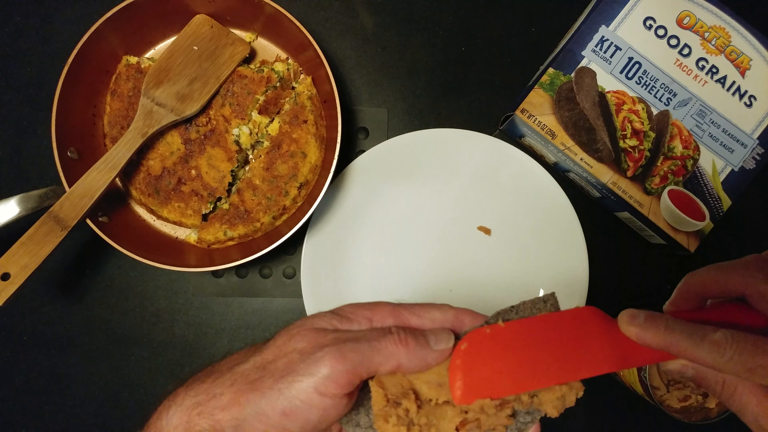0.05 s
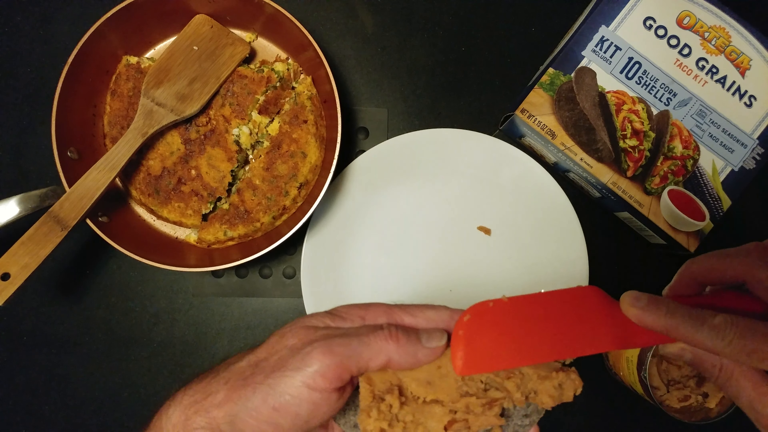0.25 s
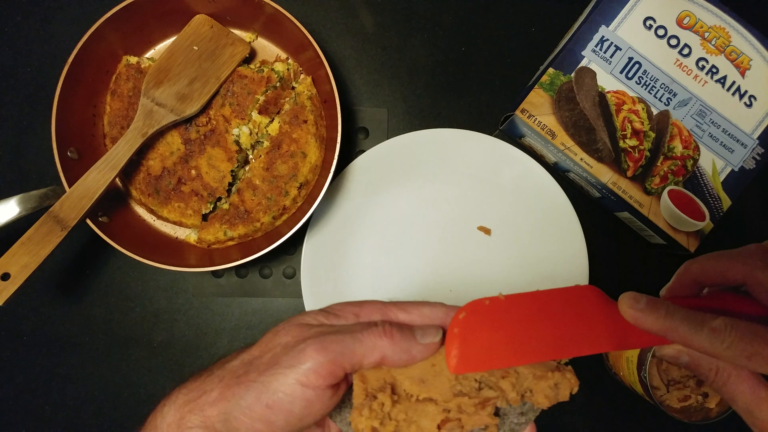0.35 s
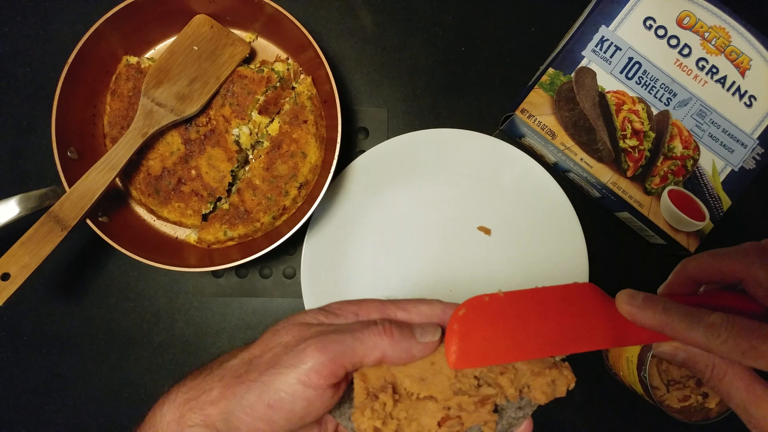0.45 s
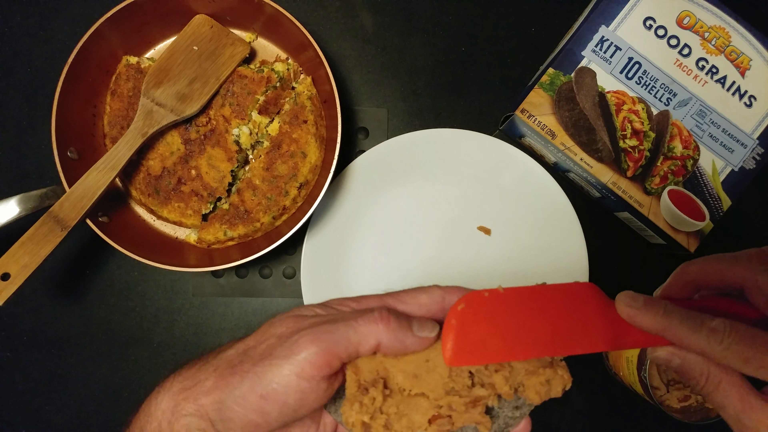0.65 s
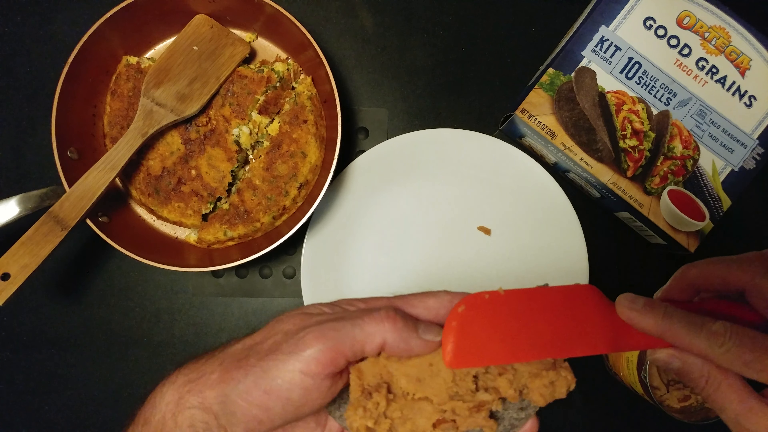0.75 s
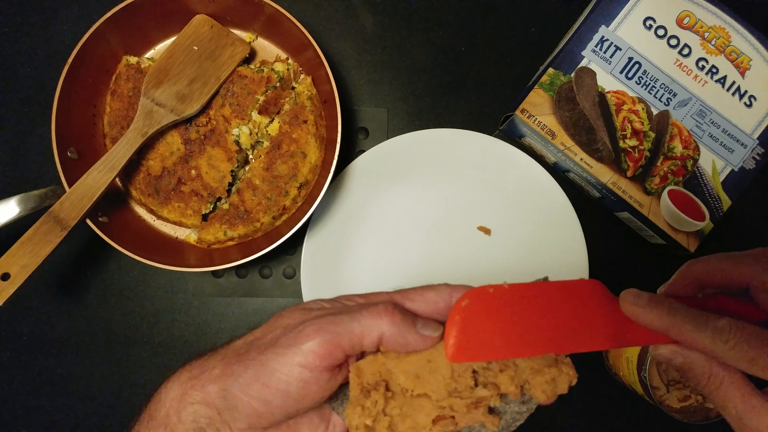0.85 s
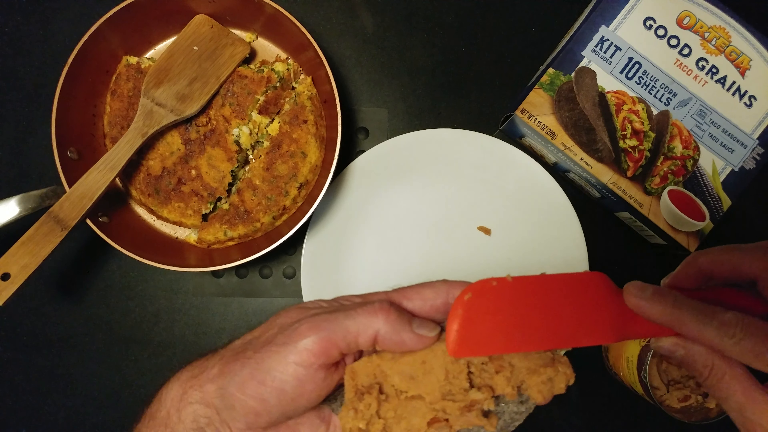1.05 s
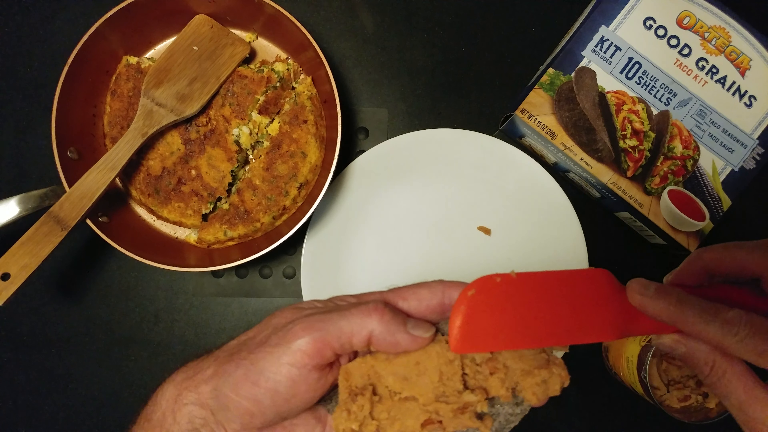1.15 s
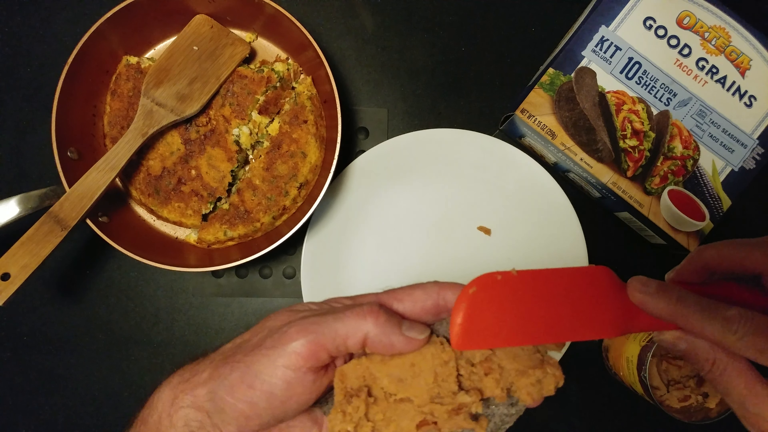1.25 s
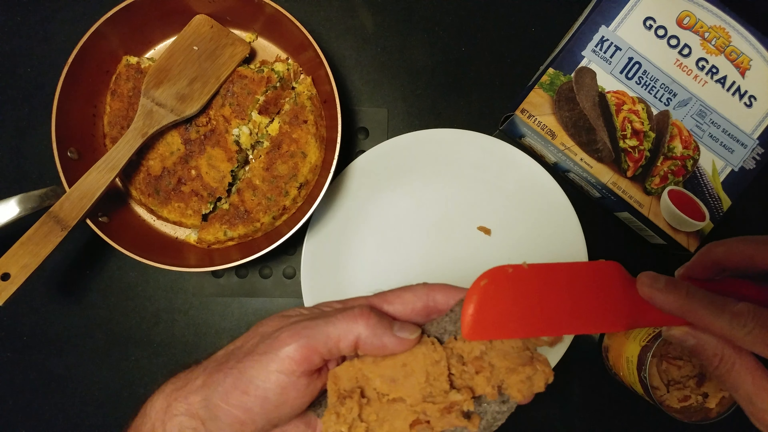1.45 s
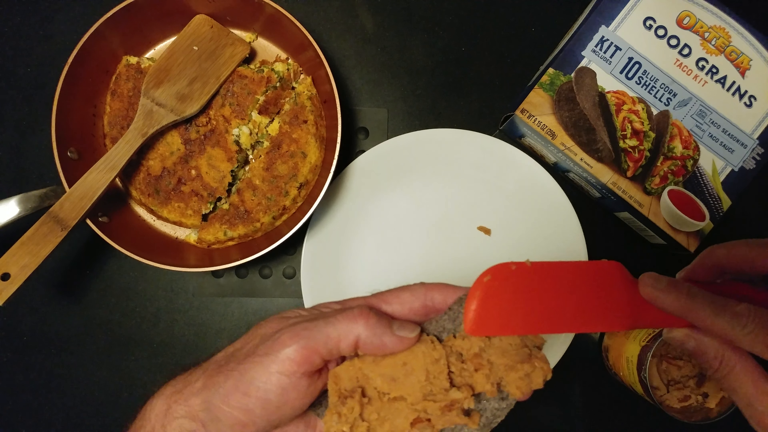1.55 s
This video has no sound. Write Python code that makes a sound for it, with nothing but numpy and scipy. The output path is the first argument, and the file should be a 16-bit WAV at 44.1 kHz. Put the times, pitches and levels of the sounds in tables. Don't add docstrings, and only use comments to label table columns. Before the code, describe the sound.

A crisp corn shell cracks under a soft spatula spreading beans. Tiny ticks from 0.03 s lead to a bright, dry crack at 0.22 s and a louder one at 0.28 s, with dull knocks and a short small-kitchen tail. Around 0.62-0.7 s comes a soft scrape with light ticks, a fainter scrape at 0.8 s, then barely audible rubs and ticks until about 1.45 s. Low refrigerator hum and faint hiss throughout.

```python
import sys
import numpy as np
from scipy import signal
from scipy.fft import rfft, irfft
from scipy.io import wavfile
from scipy.ndimage import uniform_filter1d

SR = 44100
rng = np.random.default_rng(int(sys.argv[2]) if len(sys.argv) > 2 else 0)


def makeup_ratio(level_db):
    decades = np.asarray(level_db, float) / 20
    return 10 ** decades


def to_wav(s):
    ch = np.atleast_2d(s).T
    pcm = np.round(np.clip(ch, -1, 1) * 32767)
    wavfile.write(sys.argv[1], SR, pcm.astype(np.int16))


N = 70560

# (frequency [Hz], width [Hz], left level [dB], right level [dB])
SHELL = [(1535, 1300, -27, -25), (2500, 620, -14, -7.5), (3150, 810, -2.5, -2), (4000, 560, -8, -8),
         (5070, 640, 5.4, 2), (5590, 320, -1.5, 2.1), (6395, 270, -8.5, -13), (8220, 610, -9, -9.5),
         (9000, 600, 1, -4), (12050, 400, -11.5, -12), (13000, 1000, -10.5, -10.5), (15100, 1100, -14, -14)]


def evened(x):
    return x / np.sqrt(np.mean(x ** 2) + 1e-20)


def read(points, hz):
    f, value = np.transpose(points)
    return np.interp(np.log(hz + 1), np.log(f + 1), value)


def noise(shape_db, same):
    frames, hz = N // 256 + 5, np.fft.rfftfreq(1024, 1 / SR)
    a, b, c, d, patches = rng.standard_normal((frames, 513, 5)).T
    patches = uniform_filter1d(uniform_filter1d(patches, 8, 0), 10, 1)
    patch_db = 0.7 * evened(patches)
    same = np.clip(same(hz), -1, 1)[:, None]
    left = a + 1j * b
    right = same * left + np.sqrt(1 - same ** 2) * (c + 1j * d)
    z = np.array([left, right]) * makeup_ratio(shape_db(hz)[:, None] + patch_db)
    return evened(signal.istft(z, nperseg=1024, noverlap=768)[1][:, :N])


def room_air():
    # (frequency [Hz], density [dB per Hz])
    air_curve = [(15, -44.5), (25, -14.5), (108, -2.5), (146, -12), (228, -8), (412, -9.5), (449, -13.5),
                 (521, -12), (4000, -39.5), (5200, -67), (8800, -120)]
    # (frequency [Hz], left-right likeness [-1..1])
    likeness = [(60, -0.13), (130, 0.68), (290, 0.64), (640, 0.2), (1410, -0.41), (3100, 0.96),
                (6820, -0.01), (15000, 0.03)]
    return makeup_ratio(-63.5) * noise(lambda hz: read(air_curve, hz), lambda hz: read(likeness, hz))


def microphone_hiss():
    # (frequency [Hz], density [dB per Hz])
    hiss_curve = [(800, -7.5), (2000, -4), (4000, -1.5), (7000, -2), (8600, -.5), (10700, -5), (15800, -2),
                  (16100, -31)]
    return makeup_ratio(-75) * noise(lambda hz: read(hiss_curve, hz), lambda hz: 0 * hz)


def refrigerator():
    # (frequency [Hz], width [Hz], level [dB])
    drone_lines = [(59, 8, -82.5), (115.6, 8, -77.5), (123, 4.1, -75.5), (226.5, 6, -72.5),
                   (356, 10.27, -78.5), (406.5, 20, -75.5), (832, 5, -82), (1216, 4, -92.5),
                   (1233, 4, -88.5)]
    f = np.fft.rfftfreq(N, 1 / SR)
    shape = np.zeros(len(f))
    for hz, width_hz, db in drone_lines:
        shape += makeup_ratio(db) / np.sqrt(width_hz) / (1 + (2 * (f - hz) / width_hz) ** 2)
    z = rfft(rng.standard_normal((3, N)))
    shared, apart = z[0], z[1:]
    return irfft((shared + 0.45 * apart) * shape * np.sqrt(SR / 2), N)


def knocks():
    # (time [s], frequency [Hz], strength [dB], t60 [s])
    knock_table = [(.2208, 710, -53.5, 0.055), (0.22, 1270, -56, 0.036), (0.2196, 1620, -40.5, 0.018),
                   (0.2765, 1850, -46, .012), (.2762, 2600, -22, .009), (.2763, 3280, -23.5, .011),
                   (.2222, 3290, -22.5, .012), (.1722, 2300, -56, .004), (0.2, 3700, -61.5, .004),
                   (.0262, 4600, -59, 0.0057), (0.69, 1540, -37, 0.0065), (.6750, 2560, -37, .008),
                   (0.66, 4100, -52, 0.025)]
    rise_s = 0.0021
    t, out = np.arange(2000) / SR, np.zeros(N)
    for s, hz, db, t60_s in knock_table:
        envelope = np.minimum(t / rise_s, 1) * makeup_ratio(db - 60 * t / t60_s)
        out[round(s * SR):][:2000] += envelope * np.sin(2 * np.pi * hz * t)
    return out * makeup_ratio([[-0.6], [0.6]])


def ring(centre_hz, octaves, ripple, blur=1):
    right_lag_s, lag_from_hz = 0.0002799, 2300
    skirt, ripple_db = 1.74, 1.0
    signed_f = np.fft.fftfreq(1024, 1 / SR)
    f = np.abs(signed_f) + 1
    hz, width_hz, left_db, right_db = np.array(SHELL).T[:, :, None]
    peaks = (1 + (2 * (f - hz) / (blur * width_hz)) ** 2) ** -skirt
    peaks = peaks * makeup_ratio(ripple_db * ripple[:, None]) ** 2
    power = np.array([(peaks * makeup_ratio(db) ** 2).sum(0) for db in (left_db, right_db)])
    blow = -0.5 * (np.log2(f / centre_hz) / octaves) ** 2
    log_gain = np.maximum(0.5 * np.log(power) + blow, -np.log(10 ** 5))
    lag_s = np.array([[0], [right_lag_s]]) / (1 + (lag_from_hz / f) ** 6)
    late = np.exp(-2j * np.pi * signed_f * lag_s)
    out = np.fft.ifft(np.exp(np.conj(signal.hilbert(log_gain))) * late).real
    return out / np.linalg.norm(out)


def snaps():
    # (time [s], strength [dB], centre [Hz], spread [octaves], left over right [dB])
    snap_table = [(0.0266, -45, 10200, 0.29, 1), (0.0604, -56.5, 9000, 0.25, 1.5),
                  (0.1732, -53, 3900, 2, -0.5), (0.1996, -46.5, 9500, 0.33, -4.5),
                  (0.209, -36, 5500, 1.46, -3), (.2098, -34, 6500, 0.86, 7.5),
                  (.2111, -36, 5370, 0.77, -2.5), (0.214, -32, 5500, 0.67, 2),
                  (0.2216, -18.5, 5900, 1.5, -1), (0.2212, -20.5, 5100, 1.34, -5.5),
                  (.2228, -25.5, 8670, 0.43, 11.5), (.2238, -31, 3500, 0.72, 2),
                  (0.2761, -12, 5500, 1.2, -2), (.2775, -16, 7445, 1.1, 6), (0.2783, -31.5, 3453, .9, -7),
                  (0.6545, -49, 13000, 0.77, -4.5), (0.6736, -41.5, 14200, 0.54, 7),
                  (0.6762, -46.5, 4000, 1.1, 6), (.7412, -54.5, 8500, 0.1, -6),
                  (1.0543, -61.5, 14470, 0.21, 3), (1.073, -64, 7000, 0.82, 2)]
    run_s = 0.0003
    room_blur = 2.2
    out = np.zeros((3, 2, N + 1087))
    ripples = rng.standard_normal((len(snap_table), len(SHELL)))
    runs = rng.random((len(snap_table), 3))
    for k, (s, db, hz, octaves, pan_db) in enumerate(snap_table):
        blow_s = np.arange(3) * (0.3 + 0.4 * runs[k]) * run_s
        blows = np.zeros(64)
        np.add.at(blows, np.round(blow_s * SR).astype(int), [0.3, 1, 0.3])
        crack = signal.fftconvolve(ring(hz, octaves, ripples[k]), blows[None], axes=1)
        crack = crack / np.linalg.norm(crack)
        at = round((s - run_s) * SR)
        out[0, :, at:at + 1087] += makeup_ratio(db + 22.5 + pan_db * np.array([[0.5], [-0.5]])) * crack
        out[1 + k % 2, :, at:at + 1024] += makeup_ratio(db + 18) * ring(hz, octaves, ripples[k] / 2, room_blur)
    return out[:, :, :N]


def kitchen(x):
    # (delay [s], left level [dB], right level [dB])
    wall_table = [(.0064, -17, -16), (.0080, -17, -17), (.0118, -20, -22), (.0145, -22, -22),
                  (.0205, -20, -24)]
    # (frequency [Hz], t60 [s])
    decay_curve = [(1200, 0.16), (2000, 0.12), (3000, 0.17), (5000, 0.19), (9000, .2), (15000, 0.23)]
    tail_db, start_s, rise_s = -4, 0.003, 0.0037
    size = SR // 2
    taps = np.zeros((2, size))
    slots = np.arange(0, size - 12, 12)
    at = slots + rng.integers(0, 12, (2, len(slots)))
    np.put_along_axis(taps, at, rng.choice([-1., 1.], at.shape), 1)
    hz, t, z = signal.stft(taps, SR, nperseg=128)
    decay = makeup_ratio(-60 * t / read(decay_curve, hz)[:, None])
    tail = signal.istft(z * decay, SR, nperseg=128)[1][:, :size]
    tail = tail * np.clip((np.arange(size) / SR - start_s) / rise_s, 0, 1)
    tail = makeup_ratio(tail_db) * tail / np.linalg.norm(tail[0])
    for delay_s, left_db, right_db in wall_table:
        tail[:, round(delay_s * SR)] += makeup_ratio([left_db, right_db])
    return signal.fftconvolve(x, tail, axes=1)[:, :N]


def drags():
    # (start [s], length [s], level [dB], centre [Hz], spread [octaves])
    drag_table = [
        (.624, 0.045, -55, 7600, 1.35),
        (0.806, 0.048, -60, 8600, .22),
        (.813, 0.044, -66, 2370, 1),
        (.68, .2, -74, 1500, 1.1),
        (.648, 0.028, -77, 27000, 0.38),
        (1.03, 0.05, -80, 8500, .3),
        (1.21, .04, -80.5, 7800, 0.33),
        (1.317, .14, -85.5, 9000, 0.28),
    ]
    grit_per_s, grit_db, blur = 12000, 1.2, 2.7
    size = SR // 4
    out = np.zeros((2, N))
    for start_s, length_s, db, hz, octaves in drag_table:
        t = np.arange(0, length_s, 1 / SR)
        grit = rng.standard_normal(size) * makeup_ratio(grit_db * rng.exponential(1, size))
        grit = grit * (rng.random(size) < grit_per_s / SR)
        shell = ring(hz, octaves, np.zeros(len(SHELL)), blur)
        rub = signal.fftconvolve(grit[None], shell, axes=1)[:, 1024:1024 + len(t)]
        stroke = np.interp(t / length_s, [0, 0.44, 0.83, 1], [0.32, 0.95, 0.79, 0])
        at = round(start_s * SR)
        out[:, at:at + len(t)] += makeup_ratio(db) * stroke * evened(rub)
    return out


def scene():
    near, odd, even = snaps()
    spatula = knocks() + drags()
    background = room_air() + microphone_hiss()
    echoes = kitchen(odd + spatula) + kitchen(even)
    return near + spatula + echoes + background + refrigerator()


def roll_off(x):
    return signal.sosfilt(signal.butter(12, 16990, fs=SR, output="sos"), x)


def record(dry):
    # (frequency [Hz], gain [dB])
    band_limit = [(0, 0), (15700, 0), (15900, -8), (16450, -11), (16750, -50), (SR / 2, -90)]
    hz, db = np.transpose(band_limit)
    mix = signal.oaconvolve(dry, signal.firwin2(511, hz, makeup_ratio(db), fs=SR)[None], "same")
    return roll_off(mix)


dry = scene()
out = record(dry)
to_wav(out)
```